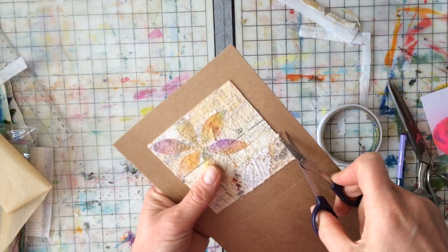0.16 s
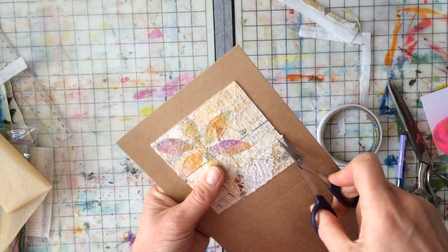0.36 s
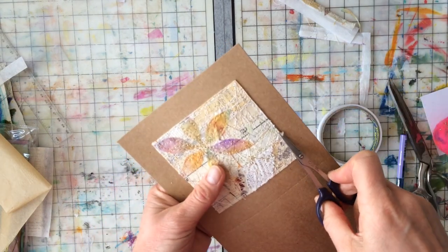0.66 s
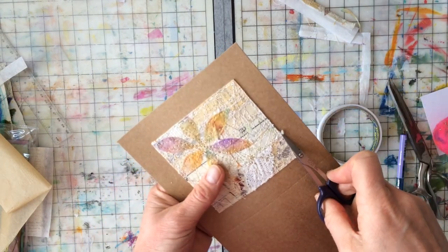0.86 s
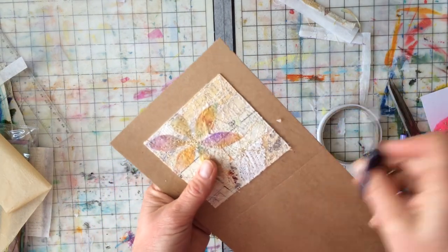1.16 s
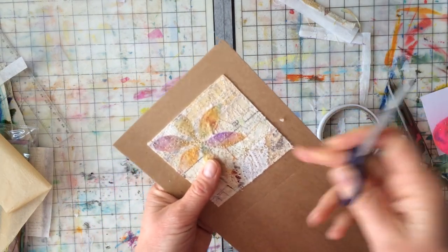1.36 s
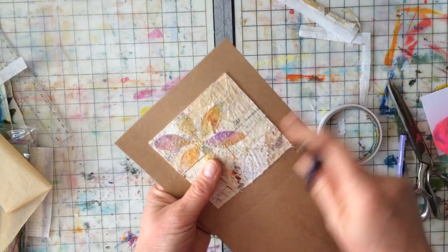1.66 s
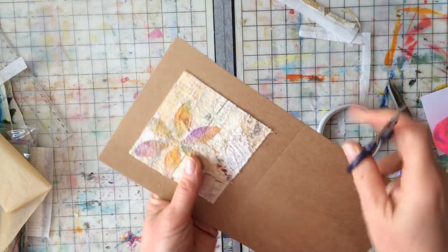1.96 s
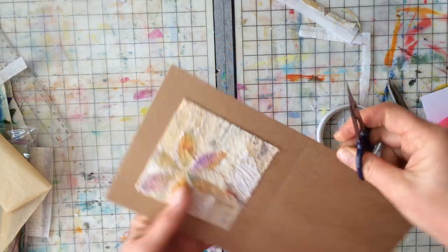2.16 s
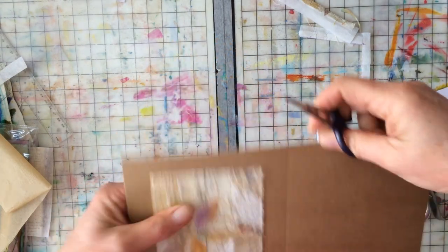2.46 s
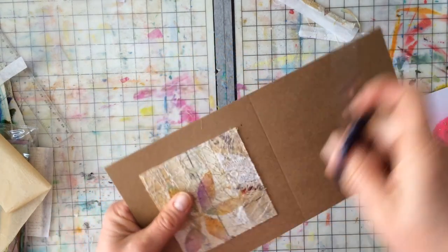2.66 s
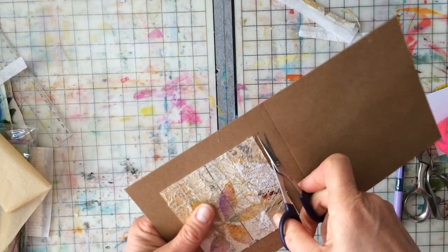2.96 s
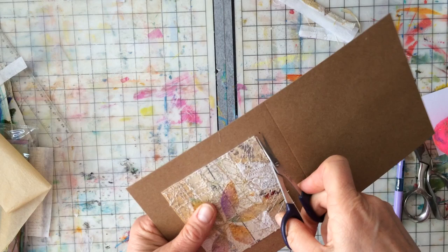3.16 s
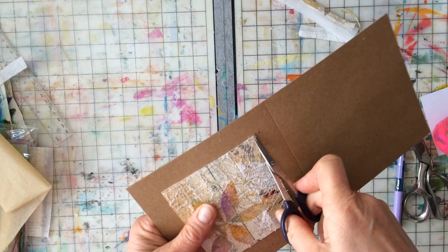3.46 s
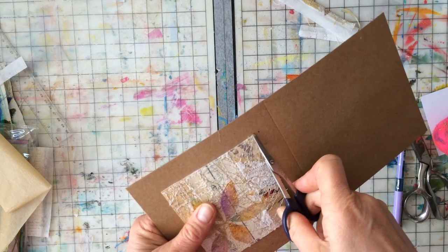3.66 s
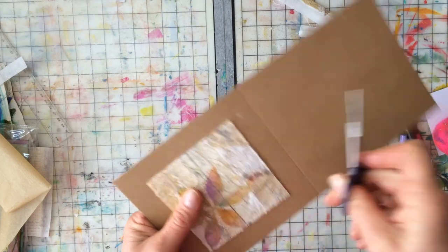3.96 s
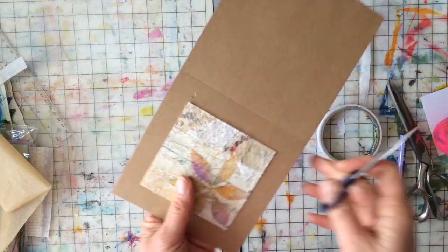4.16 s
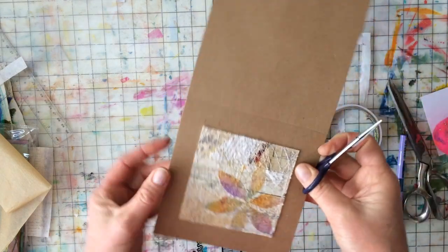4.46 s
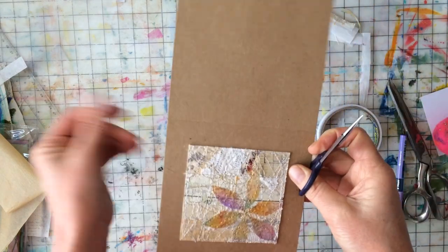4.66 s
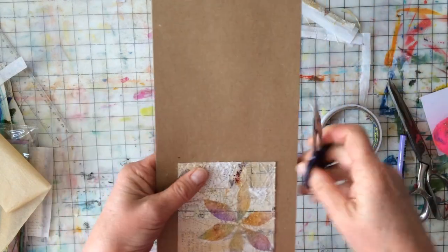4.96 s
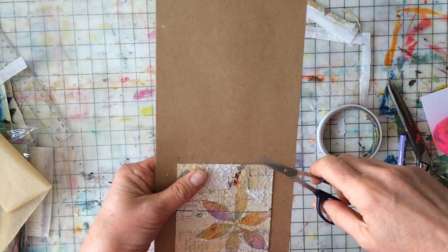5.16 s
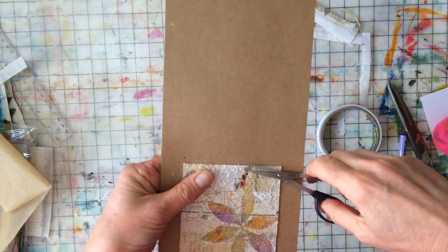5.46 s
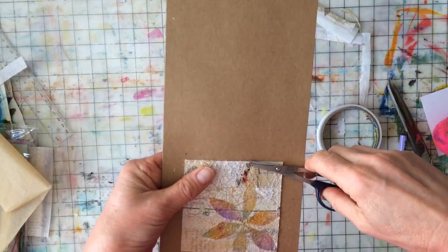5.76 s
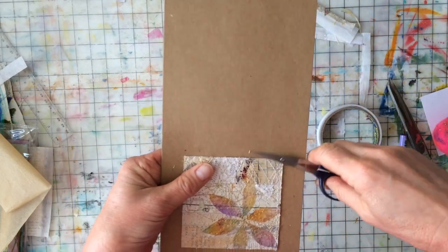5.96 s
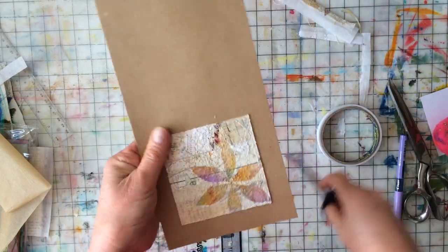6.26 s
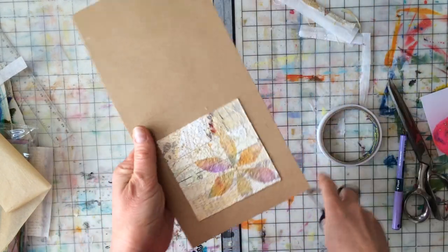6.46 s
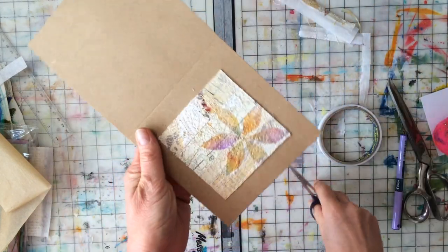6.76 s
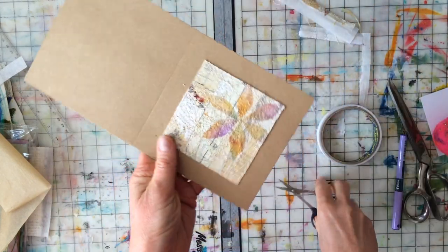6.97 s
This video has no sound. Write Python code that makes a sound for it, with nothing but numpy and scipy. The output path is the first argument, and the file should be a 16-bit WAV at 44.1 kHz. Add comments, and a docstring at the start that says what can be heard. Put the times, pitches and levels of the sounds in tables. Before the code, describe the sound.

In a quiet small room, close to the microphone, someone trims threads from fabric on a stiff card. Three brief spells of snipping, each with a faint crunch and a light steel click, are separated by handling: fingers brush and tap the card, which flutters and scrapes softly against the skin as it turns. The card's knocks are louder than the cuts.

```python
"""Faint finger taps and the hiss of stiff card turning in the hands, close by in a quiet room.
Small scissors then trim loose threads from fabric glued on the folded card: the threads crunch
and the steel blades click shut. Fingers brush offcuts away and drum on the card, which flutters.
Each sound is a source and a resonator: an impact or a stick-slip crackle excites the damped modes
of the card or of the blades."""
import sys
import numpy as np
from scipy import signal
from scipy.io import wavfile
from scipy.ndimage import uniform_filter1d

SR = 44100
rng = np.random.default_rng(int(sys.argv[2]) if len(sys.argv) > 2 else 0)


def inscribe(sig):
    """Save sig as 16-bit PCM at rate SR to the path in sys.argv[1].

    A 1-D sig is mono; a 2-D sig holds one channel per row.
    Samples are clipped to [-1, 1] before scaling.
    """
    pcm = np.round(np.clip(np.atleast_2d(sig).T, -1, 1) * 32767)
    wavfile.write(sys.argv[1], SR, pcm.astype(np.int16))


N = 313992

# modes of the card: f/Hz, bandwidth/Hz, level/dB
CARD_MODES = [(60.6, 57, 1), (164, 25.4, 15), (228.5, 45, 12), (322, 50, 16.5), (433, 26.5, 14),
              (551.4, 41, 0), (689, 57, 0.5), (735, 120, -12.5), (842, 49, -7.5), (927, 100, 9),
              (1071, 48, -3.5), (1084, 51, 7), (1252, 61, 11.5), (1522, 78, 6), (1783, 26, 10),
              (2299, 20, 10.5), (3010, 150, -4), (3860, 120, -10)]
# modes of the steel blades: f/Hz, bandwidth/Hz, level/dB
BLADE_MODES = [(1126, 45, 11), (1240, 16, 2), (1690, 180, 18), (1860, 26, -2.5), (2985, 160, 3.5),
               (4150, 28, -32), (4630, 21, 7), (5600, 330, 9), (6230, 33, 16), (6800, 650, 0.5),
               (6890, 60, 16), (7500, 180, 5.5), (8100, 60, 12.5), (12800, 410, 0), (15100, 440, 0)]
# friction spectrum of skin on paper: f/Hz, level/dB
SKIN_FRICTION = [(60, -11), (115, 3.5), (200, -5), (450, -1), (720, -2), (1100, 3), (1400, -1), (1700, 3),
                 (2100, 2.5), (2600, 1.5), (4000, 1.5), (7000, 1.5), (10000, -2.5), (16000, -5.5)]


def amp(db):
    """Amplitude ratio of a level: tenfold for every 20 dB."""
    return 10 ** (np.asarray(db) / 20)


def unit_rms(x):
    """Normalisation to unit mean power."""
    return x / np.sqrt(np.mean(x ** 2) + 1e-20)


def curve_at(points, hz):
    """Interpolation of (f/Hz, value) points on a logarithmic frequency axis."""
    f, value = np.transpose(points)
    return np.interp(np.log(hz + 1), np.log(f + 1), value)


def add(mix, s, sound):
    """Superposition: a sound joins the mix at s seconds."""
    part = mix[max(round(s * SR), 0):][:len(sound)]
    part += sound[:len(part)]


def minimum_phase(spectrum, size=4096):
    """Minimum phase gives the most compact causal impulse response with a given spectrum."""
    log_gain = np.log(amp(curve_at(spectrum, abs(np.fft.fftfreq(size, 1 / SR)))))
    return np.fft.ifft(np.exp(np.conj(signal.hilbert(log_gain)))).real[:size // 2]


def colour(x, spectrum):
    """Convolution imposes a spectral envelope on a signal."""
    return signal.oaconvolve(x, minimum_phase(spectrum))[:len(x)]


def split(x, edges_hz):
    """A band-pass filter bank divides a signal into adjacent bands."""
    filters = [signal.butter(3, band, "band", fs=SR, output="sos") for band in zip(edges_hz, edges_hz[1:])]
    return [signal.sosfilt(sos, x) for sos in filters]


def tilted(tone, level_db, bright_db):
    """Spectral tilt: band levels in dB, each shifted by its share of the brightness."""
    return [level_db + db + share * bright_db for db, share in tone]


def ringing(modes, spot_db, bend):
    """Modal superposition: the spot touched weights the damped modes, and the grip detunes them."""
    hz, width, db = np.transpose(modes)[:, :, None]
    spot, grip = rng.standard_normal((2,) + hz.shape)
    t = np.arange(SR // 8) / SR
    weight = amp(db + spot_db * spot) * 2 * np.pi * width / SR
    decay = np.exp(-np.pi * width * t)
    return (weight * decay * np.cos(2 * np.pi * hz * (1 + bend * grip) * t)).sum(0)


def impacts(rows, modes, edges_hz, radiation, bend, chatter, chatter_t60, tail_db, tail_t60):
    """Impact excitation: a force spike with contact chatter is convolved with the body's response."""
    out, radiated = np.zeros(N), minimum_phase(radiation)
    highpass = signal.butter(1, 900, "high", fs=SR)  # chatter holds little bass
    for s, *levels_db in rows:
        body = ringing(modes, spot_db=3.5, bend=bend)
        t = np.arange(len(body)) / SR
        rattle, tail = rng.standard_normal((2, len(t)))
        force = signal.lfilter(*highpass, rattle) * amp(-60 * t / chatter_t60)
        force *= chatter / np.linalg.norm(force)
        force[0] += 1
        tail *= amp(-60 * t / tail_t60)  # the many weak modes between the strong ones
        body += amp(tail_db) * tail / np.linalg.norm(tail)
        body[0] += 1
        vibration = signal.fftconvolve(force, body)[:len(t)]
        sound = signal.fftconvolve(vibration, radiated)
        for band, db in zip(split(sound, edges_hz), levels_db):
            peak_rms = np.sqrt(uniform_filter1d(band ** 2, size=220, mode="constant").max())
            add(out, s, amp(db) * band / peak_rms)
    return out


def flutter(start, level_db, hard_db, boom_db, gap_s=0.013, count=5):
    """Damped rebound: the card slaps the fingers unevenly, each time weaker, softer and deeper."""
    fade, soften, deepen = 368, 113, 60  # dB/s
    gaps = gap_s * (1 + 0.35 * rng.uniform(-1, 1, count))
    return [(start + delay, level_db - fade * delay, hard_db - soften * delay, boom_db + deepen * delay)
            for delay in np.cumsum(gaps) - gaps[0]]


def card_knocks():
    """Plate vibration: blows ring the card, hard from a nail or edge, booming where the sheet flexes."""
    # fingers and table strike the card: t/s, level/dB, hardness/dB, boom/dB
    knocks = [(0.018, -64.5, 10, 7.5), (0.079, -56, -12, -14), (0.285, -57, -19, -19),
              (0.589, -62.5, -19, -1), (0.651, -70.5, -10, 10), (1.5389, -36, 8.5, -1.5),
              (1.587, -41.5, 6.5, 2), (1.751, -35, 0.5, -5), (1.76, -43, 5, 4.5), (1.7849, -33.5, -15, 3),
              (2.111, -59, -6, 3.5), (2.143, -61, 14, 10.5), (2.583, -57, 6, 18.5),
              (3.0183, -58, 15.5, -24), (3.642, -66, -12, 4), (4.369, -47, 14.5, -18),
              (4.4202, -42, -1, 1.5), (4.6856, -55, 13, 8.5), (4.704, -39.5, -3.5, 4),
              (4.737, -45, 15.5, 0), (4.997, -64.5, 20, -5.5), (5.008, -40, 1, 4.5),
              (5.0249, -35.5, 6.5, -11), (5.051, -47.5, 10.5, -8), (6.501, -33.5, -20, -14),
              (6.285, -59.5, -6, -4), (6.826, -55.5, 2, 6), (7.086, -46, -7, -1), (7.094, -44.5, -18, 0)]
    # the card slips off a finger and springs back: t/s, level/dB, hardness/dB, boom/dB
    flutters = [(1.5767, -30, -11, -6.5), (1.795, -33, -7.5, -6), (2.596, -61.5, 15, 12.5),
                (4.75, -45.5, -17, -8), (5.042, -31, -5, -8), (6.509, -32.5, -12, -10)]
    # edges of the boom, body, knock and tick bands: f/Hz
    edges = [42, 250, 700, 2000, 16000]
    # body, knock and tick: level/dB, share of hardness
    tone = [(-0.5, 0.028), (-6.5, 1), (-19, 1)]
    # how well the card radiates: f/Hz, level/dB
    radiation = [(50, -3.5), (90, 2.5), (115, -7), (155, -1.5), (520, 0), (720, -8.5), (1150, 3),
                 (1450, -4.5), (2100, -7), (3000, -2), (8000, -4), (15000, -12)]
    slaps = [slap for row in flutters for slap in flutter(*row)]
    blows = [(s, db + boom_db, *tilted(tone, db, hard_db)) for s, db, hard_db, boom_db in knocks + slaps]
    return impacts(blows, CARD_MODES, edges, radiation, bend=0.028,
                   chatter=1.0, chatter_t60=0.031, tail_db=5.0, tail_t60=0.067)


def stick_slip(grains_per_s, grain_db, smooth, flicker_db):
    """Stick-slip friction: fibres catch and release at random under a wavering pressure."""
    strength = amp(grain_db * np.minimum(rng.exponential(1, N), 4))
    grains = strength * rng.choice([-1, 1], N) * (rng.random(N) < grains_per_s / SR)
    pressure = uniform_filter1d(uniform_filter1d(rng.standard_normal(N), size=250), size=150)
    return (unit_rms(grains) + smooth * rng.standard_normal(N)) * amp(flicker_db * unit_rms(pressure))


def swells(rows):
    """Incoherent addition: bell-shaped swells sum in power to one level curve in dB for each band."""
    t, power = np.arange(0, N, 16) / SR, 1e-14
    for s, rise, fall, *levels_db in rows:
        from_peak = np.where(t < s, ((s - t) / rise) ** 2, abs((t - s) / fall) ** 1.87)
        power = power + np.outer(amp(levels_db), np.exp(-from_peak)) ** 2
    return [np.interp(np.arange(N) / SR, t, 10 * np.log10(band)) for band in power]


def friction(drive, modes, spectrum, levels_db, spot_db, bend, size=12288):
    """Forced vibration: a crackle drives a held body whose ring changes as the contact travels."""
    # edges of the body, scrape and hiss bands: f/Hz
    edges = [100, 700, 4000, 17000]
    sound, window = drive.copy(), np.hanning(size)
    for start in range(0, N, size // 2):
        piece = drive[start:start + size]
        ring = signal.fftconvolve(piece * window[:len(piece)], ringing(modes, spot_db, bend))
        add(sound, start / SR, ring)
    bands = split(colour(sound, spectrum), edges)
    return sum(amp(db) * unit_rms(band) for band, db in zip(bands, levels_db))


def card_slides():
    """Sliding friction: the turning card glides under the skin with a fine, scratchy hiss."""
    # movements of the card: peak t/s, rise/s, fall/s, level/dB, brightness/dB
    slides = [(0.09, 0.027, 0.016, -57, -7.5), (0.19, 0.033, 0.022, -74.5, -6),
              (0.31, 0.075, 0.095, -67.5, -5.5), (0.375, 0.024, 0.044, -70.5, -9),
              (0.989, 0.018, 0.022, -64.5, -11.5), (1.055, 0.028, 0.022, -64.5, -6),
              (1.14, 0.043, 0.089, -74, 5.5), (1.968, 0.045, 0.043, -64.5, 3),
              (2.17, 0.091, 0.09, -65, -4.5), (2.27, 0.05, 0.063, -56, 3),
              (2.355, 0.052, 0.023, -54.5, 3.5), (2.561, 0.069, 0.047, -60, 6),
              (2.41, 0.033, 0.069, -70, -4.5), (2.622, 0.0081, 0.013, -61.5, 1),
              (2.75, 0.023, 0.026, -72, 3.5), (2.84, 0.044, 0.047, -72, 5),
              (3.029, 0.014, 0.064, -62, -8.5), (3.85, 0.05, 0.053, -68.5, -9.5),
              (3.943, 0.042, 0.0097, -67.5, 2), (4.12, 0.033, 0.057, -83.5, 10.5),
              (4.4, 0.01, 0.051, -58, 1), (4.498, 0.044, 0.028, -49, 2), (4.749, 0.05, 0.02, -67, -20),
              (5.21, 0.1, 0.071, -69.5, 2), (6.3, 0.03, 0.05, -65, -9.5), (6.39, 0.13, 0.14, -65, 6.5),
              (6.85, 0.024, 0.06, -67.5, -13.5), (6.88, 0.016, 0.022, -75, 5),
              (6.994, 0.046, 0.018, -56.5, -4), (7.08, 0.22, 0.063, -67.5, 6.5)]
    # body, scrape and hiss: level/dB, share of brightness
    tone = [(-6, -1.17), (0.5, 0), (-2, 0.95)]
    # body, scrape and hiss of the card shifting faintly in a still hand: level/dB
    grip = [-79.5, -77.5, -81.5]
    moves = swells([(s, rise, fall, *tilted(tone, db, bright)) for s, rise, fall, db, bright in slides])
    levels_db = [10 * np.log10(amp(move) ** 2 + amp(still) ** 2) for move, still in zip(moves, grip)]
    drive = stick_slip(grains_per_s=2200, grain_db=3.0, smooth=1.0, flicker_db=1.8)
    return friction(drive, CARD_MODES, SKIN_FRICTION, levels_db, spot_db=3.0, bend=0.045)


def gestures(rows, tone, rise_share):
    """Envelope of each short rub: its length divides into rise and fall, its level into bands."""
    return [(s, length * rise_share, length * (1 - rise_share), *tilted(tone, db, bright_db))
            for s, length, db, bright_db in rows]


def snaps(start, end, level_db, tone, gap_s=0.018, rise_s=0.0035, fall_s=0.008, count=32):
    """A jittered pulse train: single threads part in such quick succession that they blur to a creak."""
    jitter, strength = rng.standard_normal((2, count))
    times = start + gap_s * (np.arange(count) + 0.4 * jitter)
    return [(s, rise_s, fall_s, *tilted(tone, db, bright_db=-4))
            for s, db in zip(times, level_db + 3.5 * strength) if s < end]


def thread_cuts():
    """Shear fracture: threads snap between the blades and set the steel ringing."""
    # slow closings that nip single threads: start t/s, end t/s, level/dB
    closings = [(0.55, 0.9, -72), (3.473, 3.783, -73.5), (5.768, 5.88, -68.5)]
    # bites through a bunch of threads: peak t/s, length/s, level/dB, brightness/dB
    bites = [(0.9675, 0.018, -56.5, 13.5), (3.644, 0.029, -68.5, -3), (3.789, 0.0092, -71, 17),
             (3.812, 0.028, -56, 5.5), (5.888, 0.02, -51.5, -13), (5.912, 0.023, -57.5, -6),
             (5.937, 0.02, -50, -2.5), (5.998, 0.098, -59.5, -9), (6.06, 0.044, -61.5, 1)]
    # body, scrape and hiss: level/dB, share of brightness
    tone = [(-1, 0.31), (-0.5, 0.22), (-9.5, 0.95)]
    # spectrum of crunching threads: f/Hz, level/dB
    crunch = [(60, -23), (115, 5.5), (170, 8), (480, 9.5), (650, -3.5), (850, 3.5), (1120, 7.5), (1400, -3),
              (1680, -11), (2200, -8.5), (4000, -9.5), (5500, -16), (8000, -12), (11000, -14), (15000, -9)]
    drive = stick_slip(grains_per_s=1800, grain_db=4.5, smooth=0.7, flicker_db=2.0)
    nips = [snap for row in closings for snap in snaps(*row, tone)]
    levels_db = swells(gestures(bites, tone, rise_share=0.56) + nips)
    return friction(drive, BLADE_MODES, crunch, levels_db, spot_db=-2.0, bend=0.0086)


def blade_clicks():
    """Damped free vibration: steel strikes steel, and the fingers in the handles shorten the ring."""
    # blade and pivot clicks: t/s, level/dB, brightness/dB (full blade below zero, tips above)
    clicks = [(0.904, -64, 12), (0.931, -46, -11), (0.9786, -49.5, -2), (1.324, -71, 13), (1.638, -65, 4),
              (1.859, -60.5, 4), (2.01, -60, 28), (2.594, -45.5, -3), (3.8243, -46, 4), (4.186, -65.5, 5),
              (4.4216, -39.5, -5), (5.018, -53, -12), (5.884, -63, 0), (5.929, -61.5, 3), (5.9735, -53, -5),
              (6.011, -65, -8), (6.0448, -61.5, -11.5), (6.5015, -51, 27), (6.69, -67, 24), (6.779, -52, 0),
              (6.825, -61, 11), (7.1, -48, 18)]
    # edges of the four bands: f/Hz
    edges = [200, 2000, 4500, 10000, 17000]
    # bands from low to high: level/dB, share of brightness
    tone = [(-22.5, -2.5), (-1, -0.4), (2.5, 0.014), (-2.5, 0.33)]
    # how well the steel radiates: f/Hz, level/dB
    radiation = [(200, 18), (700, -5), (1150, 10.0), (1600, 0), (2300, 0.0), (5500, 0.5),
                 (8500, -4.0), (11000, -17.5), (15000, -19.5)]
    blows = [(s, *tilted(tone, db, bright_db)) for s, db, bright_db in clicks]
    return impacts(blows, BLADE_MODES, edges, radiation, bend=0.0011,
                   chatter=2.3, chatter_t60=0.0058, tail_db=1.5, tail_t60=0.038)


def fabric_strokes():
    """Friction on a soundboard: a fingertip or blade tip brushes the fabric, and the card resonates."""
    # quick strokes: peak t/s, length/s, level/dB, brightness/dB
    strokes = [(0.937, 0.016, -49.5, -1), (1.554, 0.023, -36.5, 0.5), (1.591, 0.026, -51, -8),
               (1.778, 0.026, -48, 6.5), (2.146, 0.012, -52.5, -9), (2.408, 0.013, -63, -1),
               (2.591, 0.032, -44, -4.5), (4.378, 0.023, -52.5, -9), (4.412, 0.021, -61, 4),
               (4.551, 0.019, -53, 5), (4.726, 0.024, -44, 8), (5.028, 0.009, -39, -17),
               (5.05, 0.023, -77, -8), (6.553, 0.043, -56, -1.5), (6.767, 0.011, -71, 9),
               (6.835, 0.017, -54, -9), (7.108, 0.024, -62.5, 12)]
    # body, scrape and hiss: level/dB, share of brightness
    tone = [(-0.5, -0.23), (0.5, -0.032), (-2, 1)]
    drive = stick_slip(grains_per_s=6500, grain_db=3.5, smooth=0.45, flicker_db=-0.8)
    levels_db = swells(gestures(strokes, tone, rise_share=0.44))
    return friction(drive, CARD_MODES, SKIN_FRICTION, levels_db, spot_db=2.0, bend=0.021)


def room(x, wet_db):
    """Reverberation: reflections in a small furnished room decay exponentially, slowest in the bass."""
    # reverberation time: f/Hz, T60/s
    decay_times = [(100, 0.19), (500, 0.097), (2000, 0.13), (8000, 0.15), (16000, 0.12)]
    hz, t, noise = signal.stft(rng.standard_normal(SR // 2), SR, nperseg=256)
    decay = amp(-60 * t / curve_at(decay_times, hz)[:, None])
    tail = signal.istft(noise * decay, SR, nperseg=256)[1]
    tail[:SR // 200] = 0  # the first reflection takes 5 ms
    return x + amp(wet_db) * signal.oaconvolve(x, tail / np.linalg.norm(tail))[:N]


def noise_floor(level_db):
    """Stationary noise: the low hush of the room and the microphone's hiss."""
    # spectral density: f/Hz, level/dB
    spectrum = [(15, -44), (30, -6), (48, 3.5), (80, 4), (150, 3), (350, -7.5), (700, -9.5), (1100, -16),
                (1800, -28.5), (3600, -22.5), (7000, -24.5), (16000, -27.5)]
    return amp(level_db) * unit_rms(colour(rng.standard_normal(N), spectrum))


def scene():
    """Superposition: card and scissors sound in the room, above its noise floor."""
    quiet = noise_floor(level_db=-71.5)
    direct = card_knocks() + card_slides() + thread_cuts() + blade_clicks() + fabric_strokes()
    return (room(direct, wet_db=-16.0) + quiet)[None]


def record(dry):
    """Band limiting: a linear-phase low-pass removes the highest treble."""
    cutoff_hz = 16250
    lowpass = signal.firwin(511, cutoff_hz, window=("kaiser", 9), fs=SR)
    return signal.oaconvolve(dry, lowpass[None], "same")


dry = scene()
out = record(dry)
inscribe(out)
```